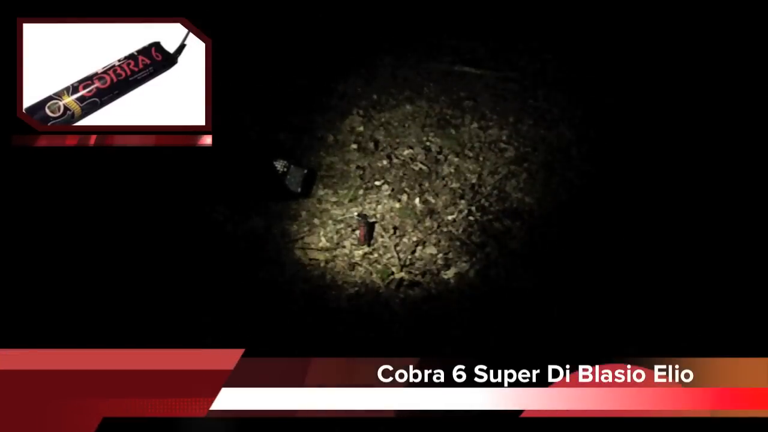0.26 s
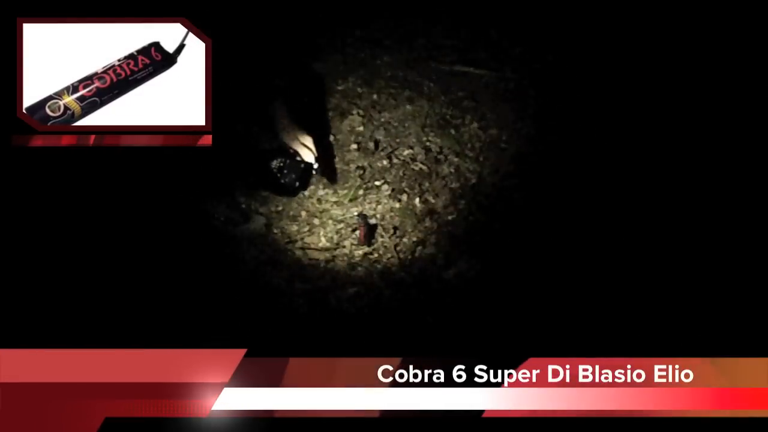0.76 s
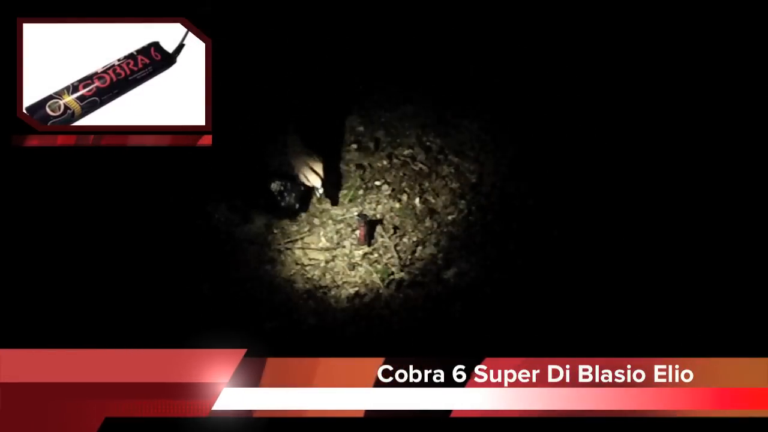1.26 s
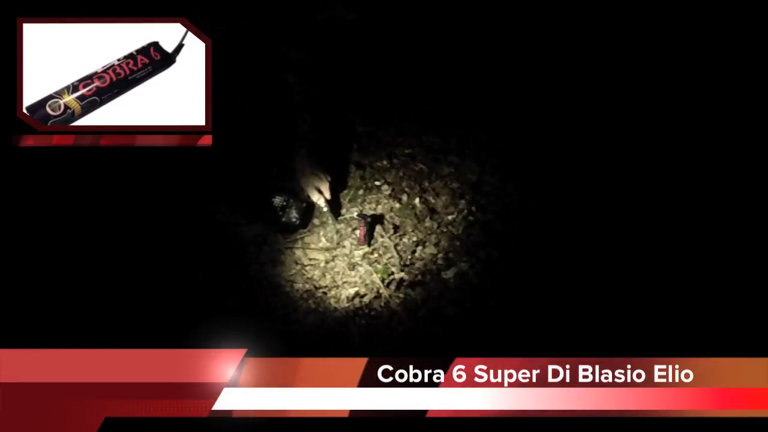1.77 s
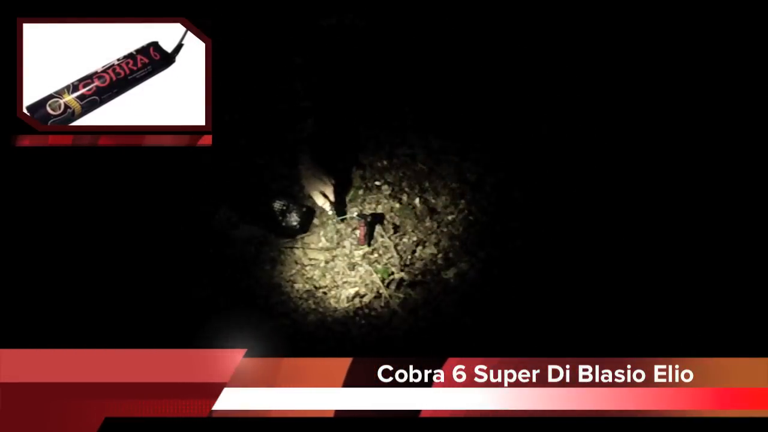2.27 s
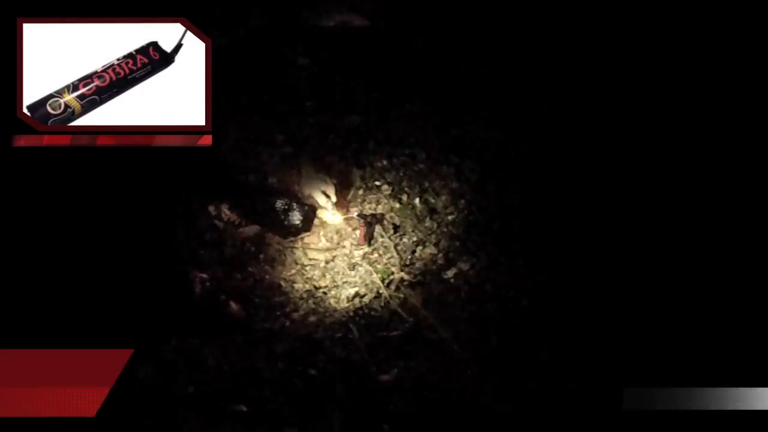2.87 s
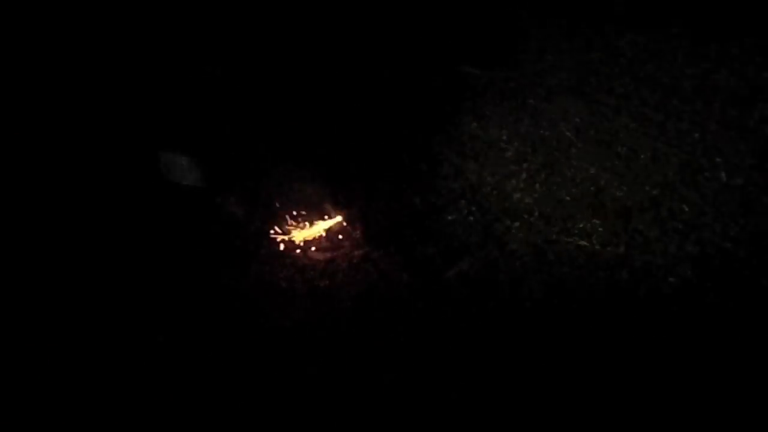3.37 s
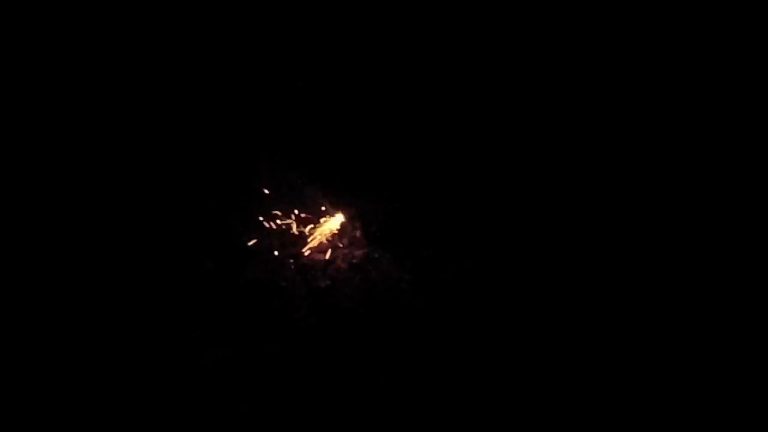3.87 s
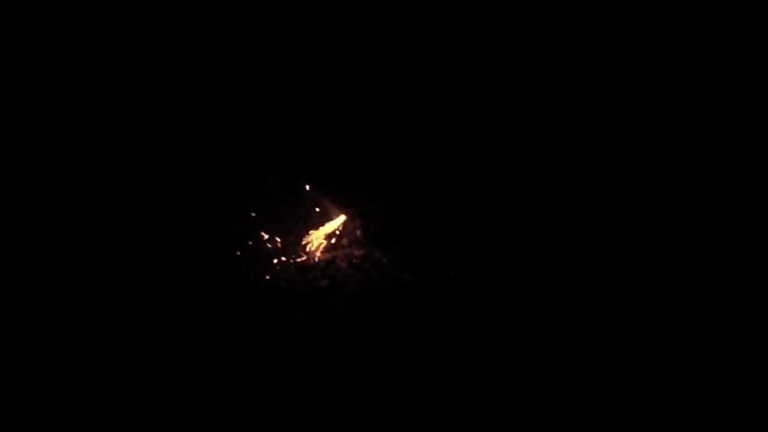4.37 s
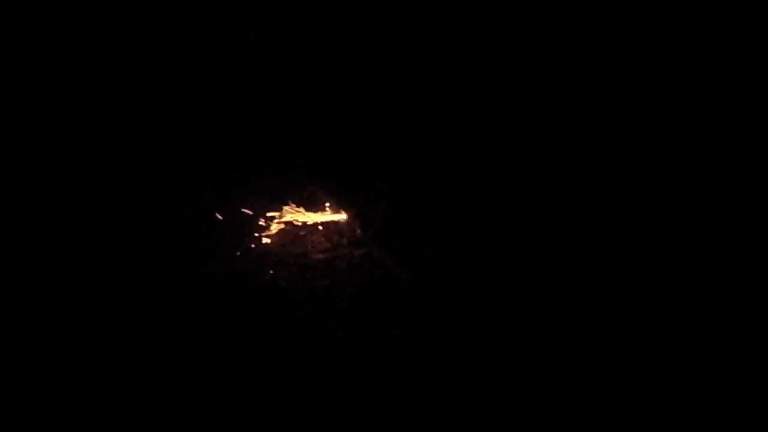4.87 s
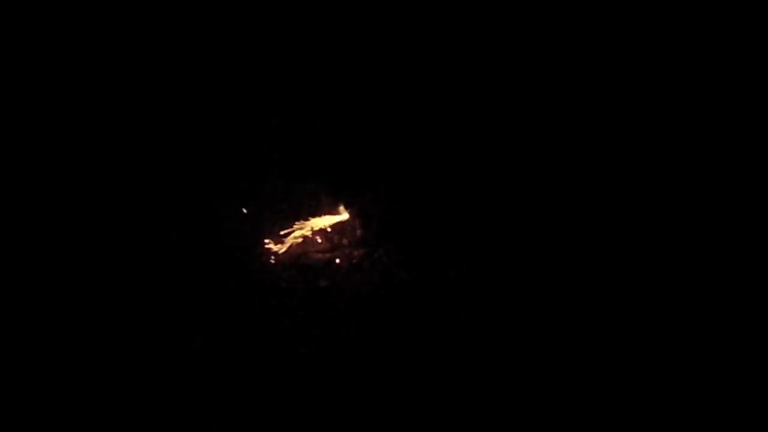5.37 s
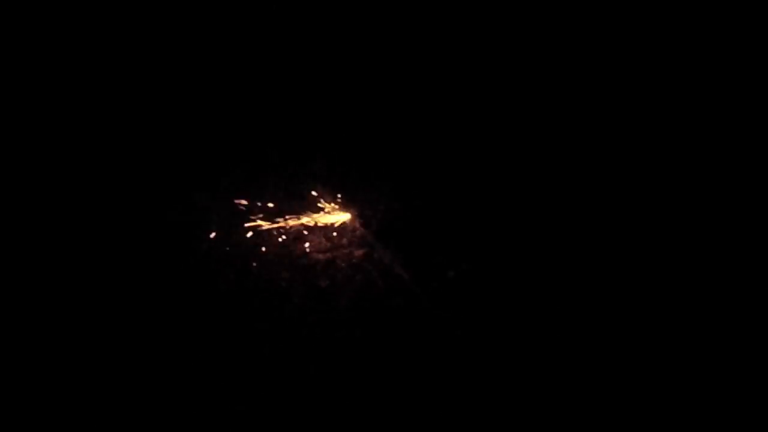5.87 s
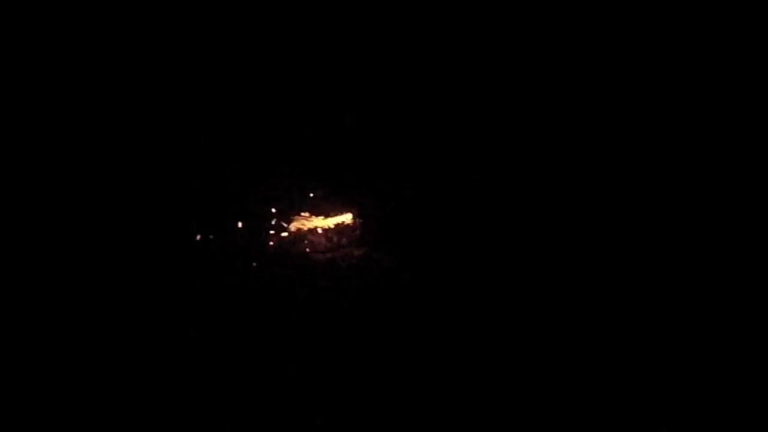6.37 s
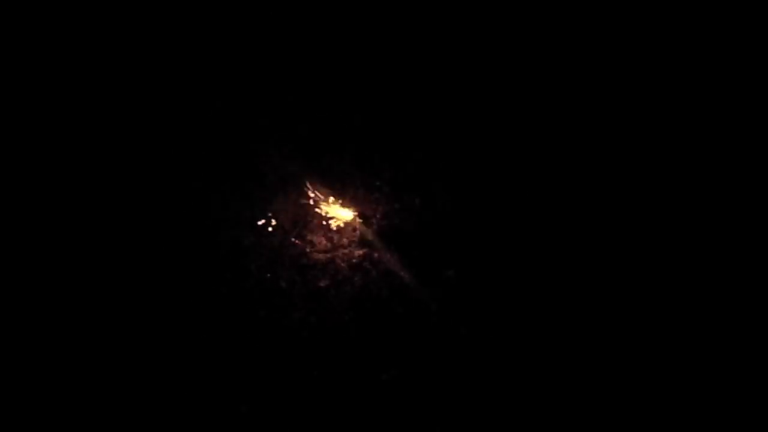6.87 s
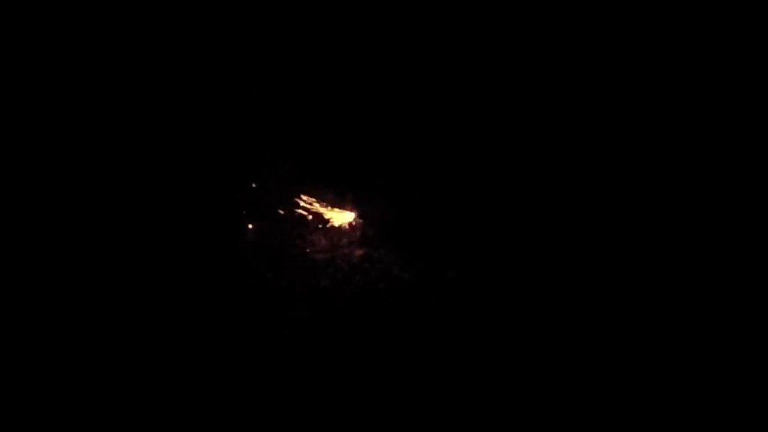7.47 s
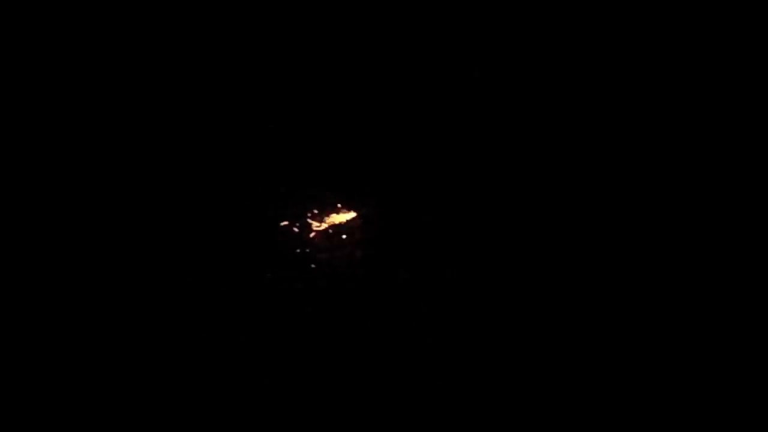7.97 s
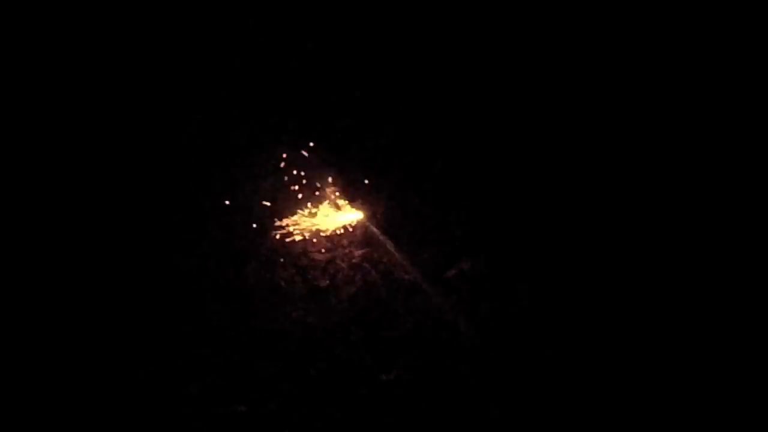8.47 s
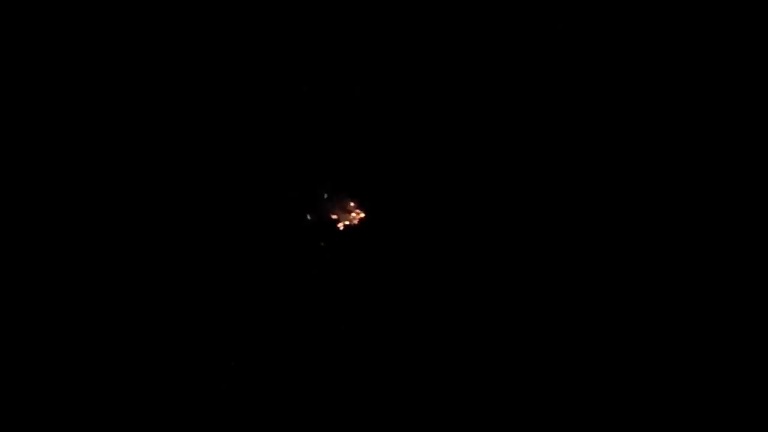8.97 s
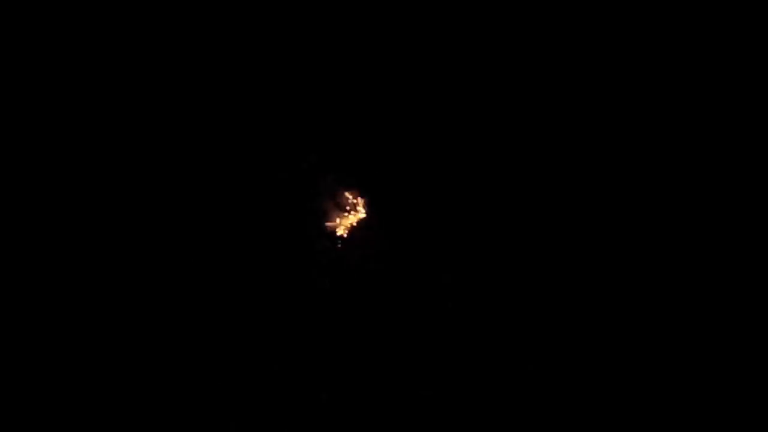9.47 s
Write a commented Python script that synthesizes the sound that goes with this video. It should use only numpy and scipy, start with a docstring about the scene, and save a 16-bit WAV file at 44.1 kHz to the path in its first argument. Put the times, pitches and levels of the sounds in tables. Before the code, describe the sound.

Outdoors at night, over a low rumble and faint distant traffic, a nylon sleeve brushes softly twice. A lighter snaps sharply with a faint hiss of gas. A firecracker fuse catches and burns with a bright, surging hiss and a few dry spits, while the hand-held microphone is bumped several times. Near the end the fuse flares loudly, then sizzles on more thinly.

```python
"""Night on gravel, over a low rumble and a far murmur of traffic. A nylon sleeve brushes twice as a hand
reaches for a firecracker; a lighter breathes gas and its igniter snaps. At 2.6 s the fuse catches and
jets gas and sparks, spitting, surging and sputtering. The hand-held camera is jostled as it backs away,
and close echoes comb the hiss. At 8.3 s the fuse flares, then burns on thinner over a faint far drone."""
import sys
import numpy as np
from scipy import signal
from scipy.fft import rfft, irfft, next_fast_len
from scipy.io import wavfile
from scipy.ndimage import uniform_filter1d, map_coordinates

SR = 44100
rng = np.random.default_rng(int(sys.argv[2]) if len(sys.argv) > 2 else 0)


def store_pcm(level_fs):
    """Save levels as 16-bit WAV."""
    pcm = np.round(np.clip(level_fs, -1, 1) * 32767).astype(np.int16)
    wavfile.write(sys.argv[1], SR, np.atleast_2d(pcm).T)


N = 428211
TIME = np.arange(N) / SR
FFT_SIZE = next_fast_len(N, True)
FREQS = np.maximum(np.fft.rfftfreq(FFT_SIZE, 1 / SR), 1)

# the burn catches, sags and flares once: t/s, hiss level/dB, roar re hiss/dB, sizzle re hiss/dB
BURN_ENVELOPE = [(2.55, -77, -6, -5), (2.79, -54, -9, -5.5), (2.85, -43, -2.5, -4.5), (3.0, -38.5, -9, -7),
                 (5.6, -40.5, -7.5, -5.5), (7.0, -46, -5.5, -5.5), (8.14, -40.5, -12, -7),
                 (8.34, -29.5, -9, -8), (8.48, -32.5, -10.5, -4.5), (8.66, -39.5, -14, -3),
                 (9.2, -41.5, -11.5, -2), (9.5, -37.5, -12.5, -5), (9.7, -38.5, -12, -2)]
# richer pockets of powder push the jet: t/s at the crest, length/s, lift/dB
POWDER_SURGES = [(3.053, 0.086, 1.5), (3.321, 0.14, 7.5), (3.55, 0.083, 5.5), (3.715, .14, 3),
                 (4.0, 0.063, 2), (4.186, .12, 2), (4.42, 0.22, 2), (4.82, .14, 3), (5.25, 0.31, 3),
                 (5.438, 0.13, 5), (5.57, 0.43, 4), (5.751, 0.099, 4.5), (5.957, .22, 5), (6.14, 0.24, 2),
                 (6.328, 0.15, 4.5), (6.48, 0.28, 4), (6.707, 0.24, 5), (7.223, 0.48, 6.5),
                 (7.568, 0.23, 3), (7.83, .12, 0), (8.84, 0.44, 2)]
# tone of the full jet, before the flare: f/Hz, level/dB
FULL_JET_EQ = [(530, -26), (900, -12.5), (1600, -9.5), (2600, -3.5), (3310, -9), (3680, -9.5), (4670, 0),
               (5330, -3.5), (8490, 1.5), (9560, -1), (11700, 0.5), (13400, 0), (15600, -7)]
# tone of the thin jet, after the flare: f/Hz, level/dB
THIN_JET_EQ = [(530, -49), (900, -24), (1120, -15), (1230, -15.5), (2800, -5.5), (3350, -12), (4050, -7),
               (5520, -6), (6370, -7), (8000, 0.5), (10600, 1), (13700, -1.5), (15600, -7.5)]
def fuse(spark_db=-2, thin_spark_db=-9, waver_db=.5, flicker_db=.57, sputter_db=.5):
    """Turbulent gas and popping grains; the jet's roar, hiss and sizzle surge and sputter together."""
    burn_db, roar_db, sizzle_db = curves(BURN_ENVELOPE)
    surge_db = sum(db * swell(s, length_s) for s, length_s, db in POWDER_SURGES)
    surge_db += waver_db * wobble(18)
    grains = sparks(per_s=4000, spread_db=3)
    full_jet = shape(noise() + undb(spark_db) * grains, eq(FULL_JET_EQ))
    thin_jet = shape(noise() + undb(thin_spark_db) * grains, eq(THIN_JET_EQ))
    crossfade = np.clip((TIME - 8.15) / .43, 0, 1)  # across the flare
    gas = np.sqrt(1 - crossfade) * full_jet + np.sqrt(crossfade) * thin_jet
    highs, top = highpass(4430), highpass(11540, order=16)
    bands = [(highpass(720, order=4) * (1 - highs), roar_db + .47 * surge_db),
             (highs * (1 - top), surge_db),  # the hiss rides the surges hardest
             (top, sizzle_db + .9 * surge_db)]
    jet = sum(shape(gas, band) * undb(db + flicker_db * wobble(25)) for band, db in bands)
    catch = np.clip((TIME - 2.55) / .05, 0, 1)
    return jet * catch * undb(burn_db + sputter_db * wobble(60))


def sparks(per_s, spread_db):
    """Tiny pops of powder grains: many small, a few large."""
    sizes = undb(spread_db * np.minimum(rng.exponential(size=N), 5))
    pops = rng.random(N) < per_s / SR
    return unit(pops * sizes * np.sign(noise()))


# sharp accents in the burn: t/s, level/dB, f/Hz
FUSE_SPITS = [(2.595, -44, 7000), (2.622, -43, 7000), (2.676, -36, 6000), (2.947, -24, 7000),
              (3.311, -13, 6200), (3.315, -20, 7000), (3.457, -25, 2500), (3.556, -21, 7000),
              (4.535, -24, 4500), (5.435, -24, 7500)]
def spits(decay_per_cycle=.8, puff_db=-18, puff_t60=.025):
    """Larger grains go off with a dry crack of a few cycles and a short bright puff."""
    cracks, puffs = np.zeros(N), np.zeros(N)
    t = np.arange(SR // 4) / SR
    for s, db, hz in FUSE_SPITS:
        add(cracks, s, undb(db) * np.sin(2 * np.pi * hz * t) * np.exp(-decay_per_cycle * hz * t))
        add(puffs, s, undb(db + puff_db) * fade(t, puff_t60))
    return cracks + puffs * shape(noise(), resonance(6600, 8000) ** 2)


# early reflections as the camera moves: t/s at the crest, length/s, delay/ms, drift/(ms/s), signed gain
ECHO_TAPS = [(3.2, 7.5, 0.564, -0.0032, -0.046), (4.9, 4.1, 0.866, -0.0086, 0.15),
             (5.2, 6, 0.681, -0.0045, 0.17), (5.5, 9.2, 1.21, 0.0058, -0.058),
             (6.0, 6.1, 0.77, 0.0073, 0.14), (6.6, 5, 0.606, 0.009, 0.14), (7.0, 4.2, 1.261, 0.003, -0.1),
             (7.2, 5.2, 0.543, -0.01, 0.13), (7.9, 16.0, 0.413, 0.0048, -0.083)]
def near_echoes(x, low_cut_hz=3800):
    """Small surfaces nearby throw the treble back a moment late, a drifting comb on the hiss."""
    treble = irfft(rfft(x, FFT_SIZE) * highpass(low_cut_hz, order=1), FFT_SIZE)[:N]
    echoes = sum(gain * swell(s, length_s) * delayed(treble, delay_ms + drift * (TIME - s))
                 for s, length_s, delay_ms, drift, gain in ECHO_TAPS)
    return x + echoes + gravel_scatter(treble)


def gravel_scatter(x, db=-16, nearest_ms=1, farthest_ms=2.6, sway_ms=.019, count=6):
    """Stones add faint later echoes, whose paths sway with the camera."""
    paths_ms = rng.uniform(nearest_ms, farthest_ms, count)
    return undb(db) / np.sqrt(count) * sum(delayed(x, ms + sway_ms * wobble(.8)) for ms in paths_ms)


# the ring of the lighter's snap: f/Hz, width/Hz, level/dB
IGNITER_MODES = [(2700, 190, -11), (3920, 380, 0), (5420, 1400, 2.5), (7330, 290, 1.5), (8000, 260, -2.5),
                 (8630, 220, -5), (9500, 290, -14), (10800, 240, -20), (11700, 680, -7.5),
                 (13800, 330, -15)]
def igniter(s=1.6936, snap_db=-8, chatter_s=.00162, thump_db=-32, thump_hz=135, tail_db=-48):
    """The spring hammer chatters briefly and rings the lighter; the gravel scatters it back."""
    t = np.arange(SR // 2) / SR
    ring_out = np.maximum(t - chatter_s, 0)
    ring = sum(undb(db) * np.sin(2 * np.pi * hz * t + rng.uniform(0, 2 * np.pi))
               * np.exp(-np.pi * width * ring_out) for hz, width, db in IGNITER_MODES)
    ring /= np.sqrt(np.mean(ring[t < chatter_s] ** 2))
    crack = undb(-8) * rng.standard_normal(len(t)) * fade(t, t60=.018)
    attack = np.minimum(t / .00013, 1)
    low_cut = signal.butter(4, 1900, "high", fs=SR, output="sos")
    snap = signal.sosfilt(low_cut, undb(snap_db) * (ring + crack) * attack)
    scatter = unit(signal.fftconvolve(rng.standard_normal(len(t)), snap)[:len(t)])
    wash = undb(-3) * shape(noise(), resonance(6500, 7800) ** 2)[:len(t)]
    tail = undb(tail_db) * (scatter + wash) * fade(t, t60=.48)
    # the button bottoms out under the thumb
    thump = undb(thump_db) * np.sin(2 * np.pi * thump_hz * t) * fade(t, t60=.068)
    out = np.zeros(N)
    add(out, s, snap + thump + tail)
    return out


# the lighter's breath: t/s, level/dB
GAS_ENVELOPE = [(1.35, -81), (1.55, -68), (2.3, -68.5), (2.6, -72), (2.8, -90)]
def lighter_gas(hz=5320, upper_hz=10050, upper_db=-7, width_hz=800):
    """Gas whistles softly in two resonances of the nozzle."""
    nozzle = resonance(hz, width_hz) ** 2 + undb(upper_db) * resonance(upper_hz, width_hz) ** 2
    return fader(GAS_ENVELOPE) * shape(noise(), nozzle)


# the hand bumps the camera: t/s, tick level/dB, tick f/Hz, thump level/dB
CASE_KNOCKS = [(3.695, -32, 497, -50), (3.874, -34, 700, -22), (3.987, -29, 664, -28),
               (4.019, -38, 450, -51), (4.195, -33.5, 500, -25.5), (4.479, -27, 560, -34),
               (4.496, -31, 800, -28), (4.509, -31, 448, -42), (4.535, -33, 800, -33),
               (4.661, -30.5, 189, -46), (4.676, -28, 178, -40), (4.764, -34, 480, -48),
               (4.775, -27, 750, -42), (4.786, -34, 650, -23.5)]
# the grip rubs while walking: t/s, level/dB
GRIP_ENVELOPE = [(2.7, -62), (3.3, -55), (3.9, -56), (4.7, -56), (5.2, -58.5), (6.0, -60.5), (8.0, -60),
                 (9.7, -63.5)]
def handling(decay_per_cycle=2, thump_hz=42, thump_t60=.14, rough_db=3):
    """Each knock is a dead tick of the case and a slow thump; the grip rubs in between."""
    knocks = np.zeros(N)
    t = np.arange(SR // 4) / SR
    attack = np.minimum(t * thump_hz * 2, 1)  # half a cycle
    thump = 2 * np.sin(2 * np.pi * thump_hz * t) * fade(t, thump_t60) * attack
    for s, tick_db, hz, thump_db in CASE_KNOCKS:
        tick = 1.73 * np.sin(2 * np.pi * hz * t) * np.exp(-decay_per_cycle * hz * t)
        add(knocks, s, undb(tick_db) * tick + undb(thump_db) * thump)
    rub = shape(noise() * undb(rough_db * wobble(50)), resonance(350, 900) ** 2)
    return knocks + fader(GRIP_ENVELOPE) * rub


# the hand reaches for the fuse: t/s at the crest, level/dB, release/(dB/s)
SLEEVE_BRUSHES = [(.37, -57.5, 38), (1.24, -57.5, 22)]
def sleeve(hz=7800, width_hz=9000, rough_db=1.5, attack_db_per_s=65):
    """Nylon slides with a fine uneven hiss; each brush swells quickly and dies away."""
    strokes = sum(undb(db - np.maximum(attack_db_per_s * (s - TIME), release * (TIME - s)))
                  for s, db, release in SLEEVE_BRUSHES)
    return strokes * undb(rough_db * wobble(79.5)) * shape(noise(), resonance(hz, width_hz) ** 2)


# far traffic swells and recedes: t/s, level/dB
TRAFFIC_ENVELOPE = [(0, -63.5), (1.2, -58.5), (2.6, -59), (4.0, -67.5), (9.7, -61.5)]
def traffic(hz=1010, width_hz=750):
    """Tyre noise from a distant road."""
    return fader(TRAFFIC_ENVELOPE) * shape(noise(), resonance(hz, width_hz) ** 3)


# tone of the still night air: f/Hz, level/dB
AIR_EQ = [(12, -24), (22, 0.5), (36, 2.5), (70, -3.5), (110, -12.5), (170, -22), (300, -28), (650, -34.5),
          (1150, -32), (1900, -44.5), (3300, -49), (9800, -47), (12500, -53), (15600, -64)]
def night_air(db=-38, swell_db=1):
    """A bed of low outdoor rumble, swelling slightly."""
    rumble = shape(noise(), eq(AIR_EQ) * highpass(16, order=3))
    return rumble * undb(db + swell_db * wobble(3.045))


# the drone creeps in near the end: t/s, level/dB
DRONE_ENVELOPE = [(8.1, -90), (8.45, -63), (9.0, -64), (9.7, -69)]
def far_drone(hz=361, waver=.00406):
    """One faint far tone with a wavering pitch."""
    phase = 2 * np.pi * np.cumsum(hz * (1 + waver * wobble(8.8))) / SR
    return fader(DRONE_ENVELOPE) * unit(np.sin(phase))


def undb(db):
    """Decibels to gain."""
    return 10 ** (db / 20)


def unit(x):
    """Scale to rms 1."""
    return x / np.sqrt(np.mean(x ** 2))


def curves(table):
    """Each column after t/s as a curve over time."""
    s, *columns = np.transpose(table)
    return [np.interp(TIME, s, column) for column in columns]


def fader(table):
    """Gain over time from t/s, level/dB points."""
    return undb(curves(table)[0])


def eq(table):
    """Gain at every frequency from f/Hz, level/dB points."""
    hz, db = np.transpose(table)
    return undb(np.interp(np.log(FREQS), np.log(hz), db))


def resonance(hz, width_hz):
    """Response of one resonance, gain 1 at its centre."""
    return 1 / (1 + 1j * (FREQS ** 2 - hz ** 2) / (FREQS * width_hz))


def highpass(hz, order=8):
    """Gain curve of a low cut."""
    return 1 / np.sqrt(1 + (hz / FREQS) ** (2 * order))


def shape(x, response):
    """Filter by a frequency response, at rms 1."""
    return unit(irfft(rfft(x, FFT_SIZE) * response, FFT_SIZE)[:N])


def noise():
    """White noise."""
    return rng.standard_normal(N)


def wobble(rate_hz):
    """Random sample-and-hold, smoothed twice, at rms 1."""
    hold = int(SR / rate_hz)
    steps = np.repeat(rng.standard_normal(N // hold + 1), hold)[:N]
    return unit(uniform_filter1d(uniform_filter1d(steps, hold), hold))


def swell(s, length_s):
    """A smooth rise from 0 to 1 and back, centred on time s."""
    inside = np.abs(TIME - s) < length_s / 2
    return inside * np.cos(np.pi * (TIME - s) / length_s) ** 2


def fade(t, t60):
    """Decay by 60 dB in t60 seconds."""
    return undb(-60 * t / t60)


def delayed(x, ms):
    """A delay line whose time may drift."""
    return map_coordinates(x, [(TIME - ms / 1000) * SR])


def add(out, s, x):
    """Mix x into out from time s on."""
    i = int(s * SR)
    out[i:i + len(x)] += x[:N - i]


def scene():
    """Fuse, foley and ambience reach one microphone, the same in both channels."""
    burning = near_echoes(fuse() + spits())
    foley = sleeve() + igniter() + lighter_gas() + handling()
    ambience = traffic() + night_air() + far_drone()
    mono = burning + foley + ambience
    return np.array([mono, mono])


def record(dry):
    """The camera clips near full scale, cuts the top and rests slightly off zero."""
    ceiling, top_hz, dc_offset = .85, 15620, .0345
    lowpass = signal.ellip(10, .1, 80, top_hz, fs=SR, output="sos")
    return signal.sosfilt(lowpass, np.clip(dry, -ceiling, ceiling)) + dc_offset


dry = scene()
out = record(dry)
store_pcm(out)
```